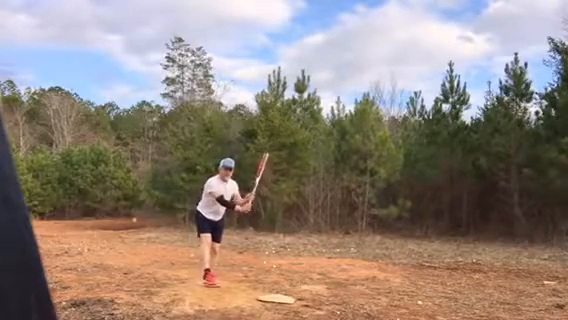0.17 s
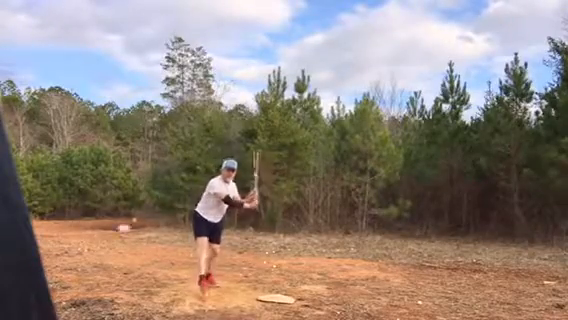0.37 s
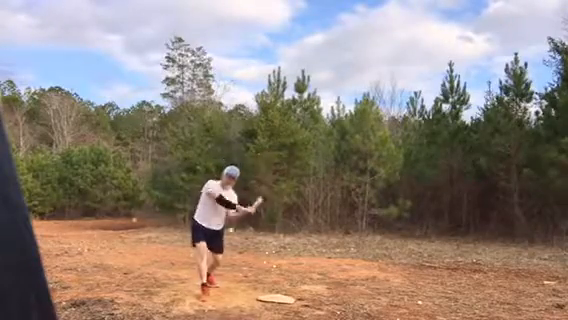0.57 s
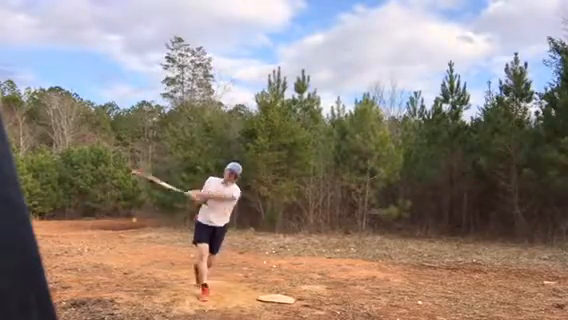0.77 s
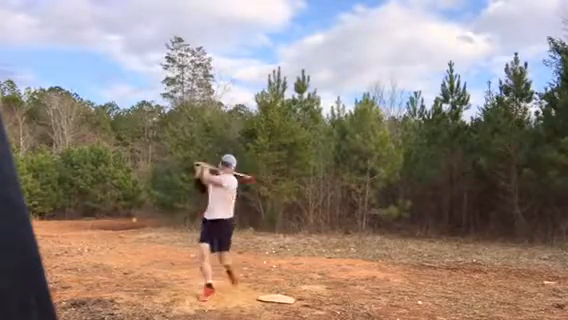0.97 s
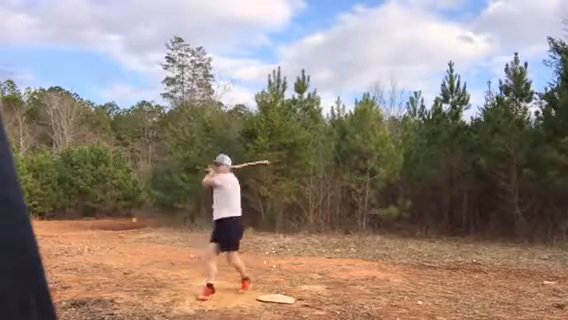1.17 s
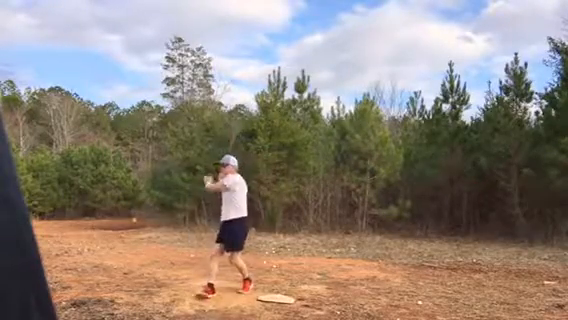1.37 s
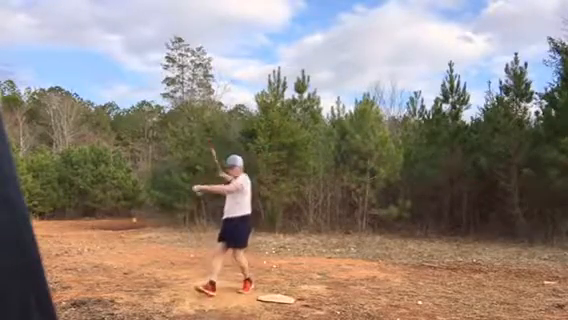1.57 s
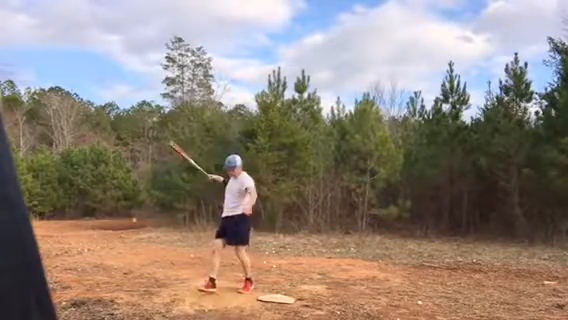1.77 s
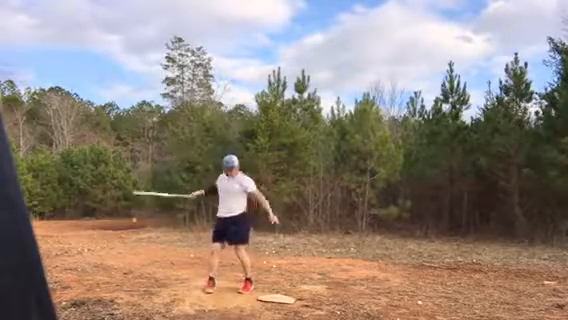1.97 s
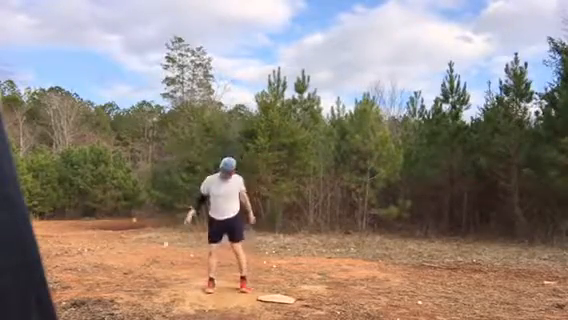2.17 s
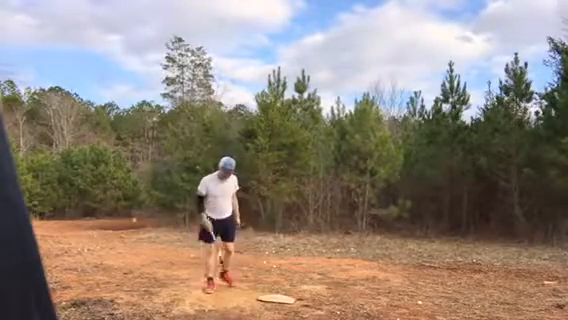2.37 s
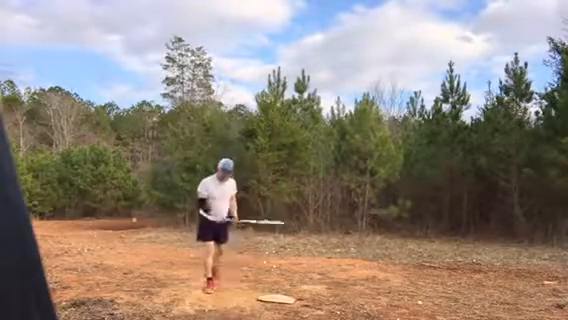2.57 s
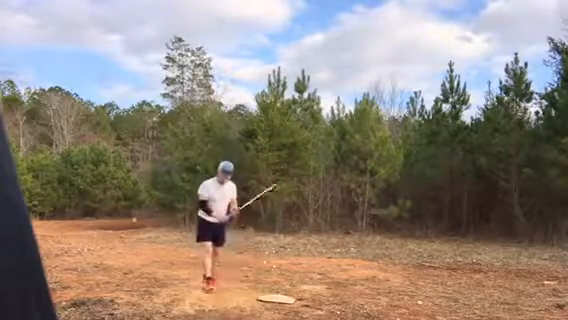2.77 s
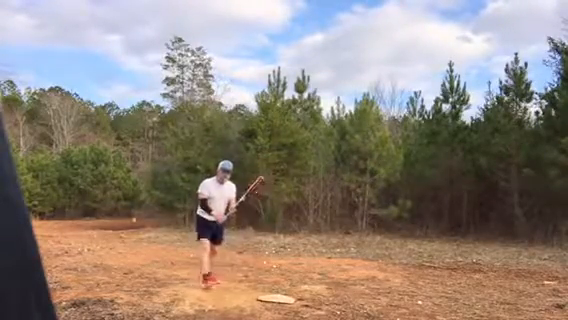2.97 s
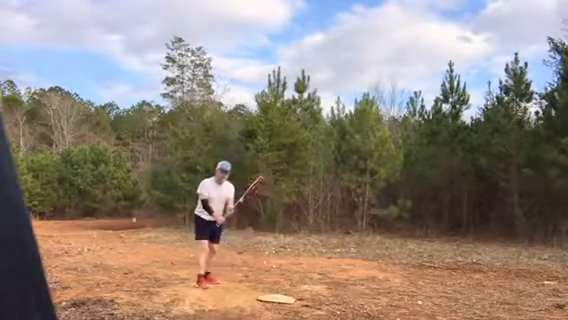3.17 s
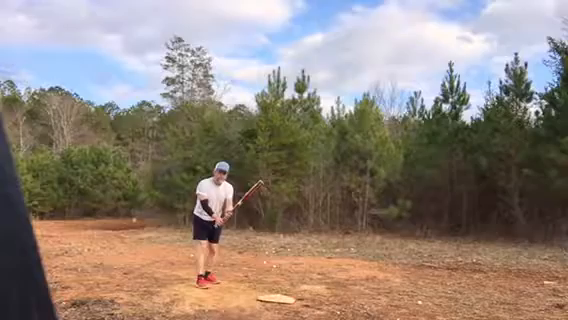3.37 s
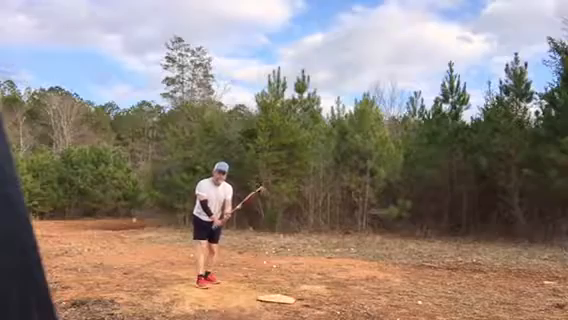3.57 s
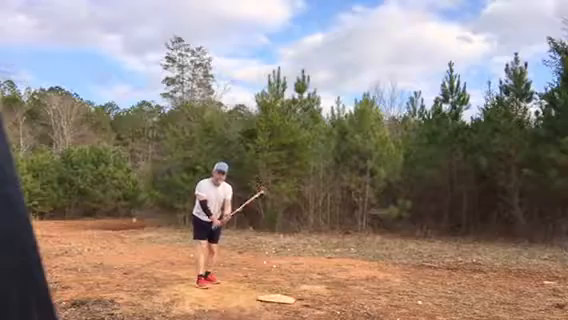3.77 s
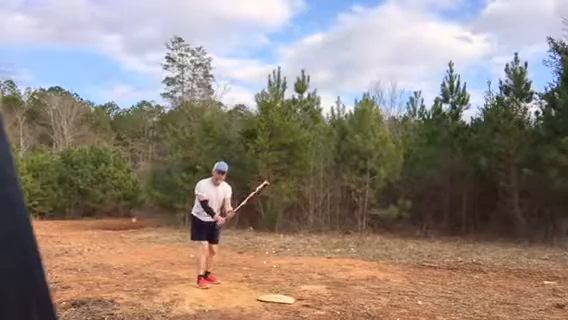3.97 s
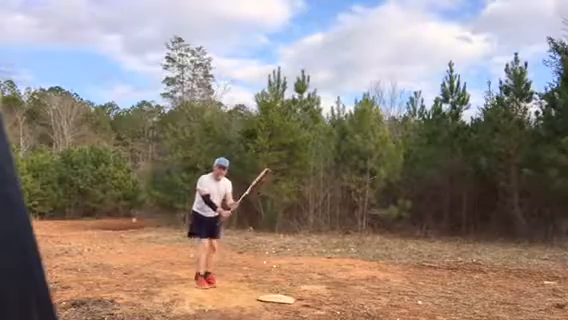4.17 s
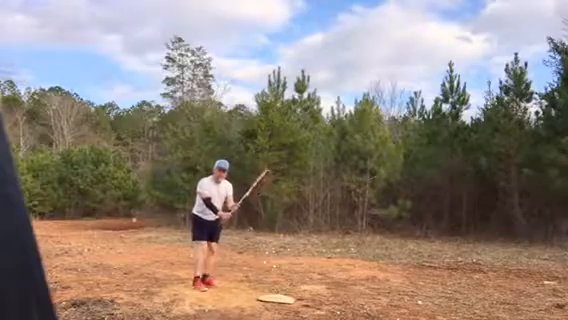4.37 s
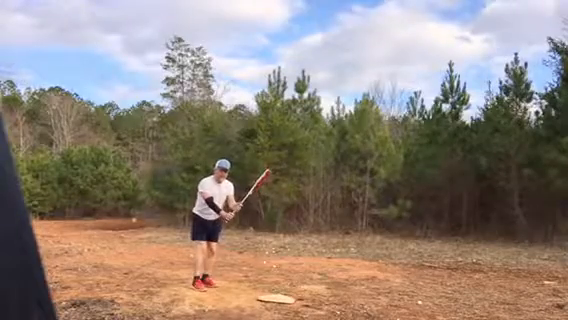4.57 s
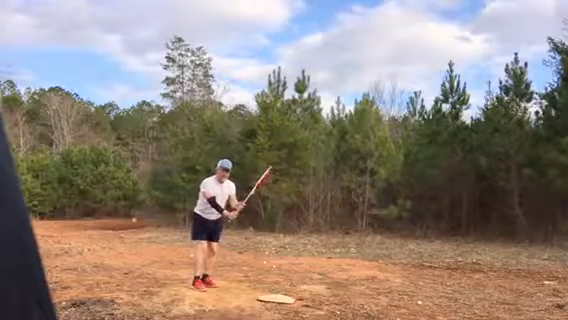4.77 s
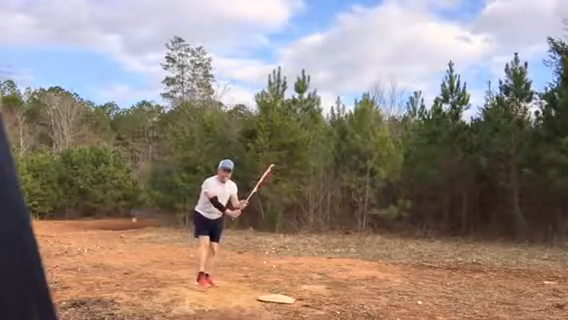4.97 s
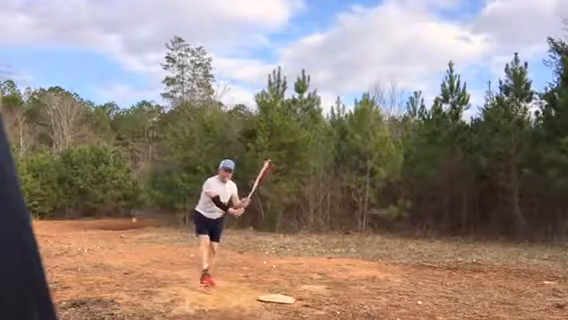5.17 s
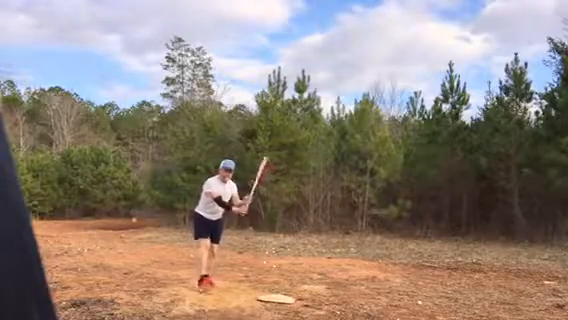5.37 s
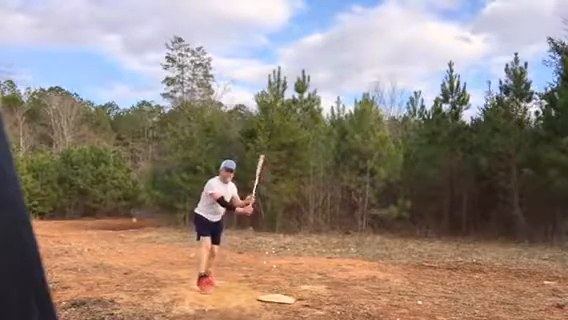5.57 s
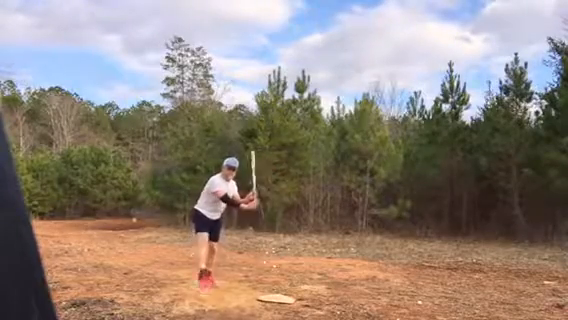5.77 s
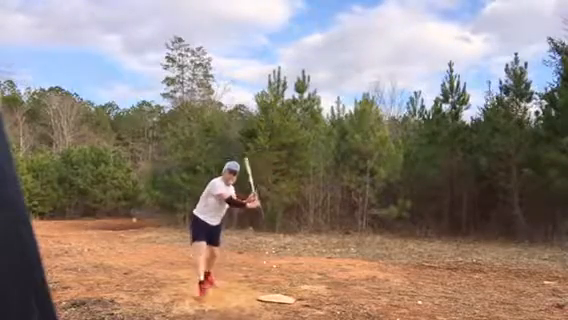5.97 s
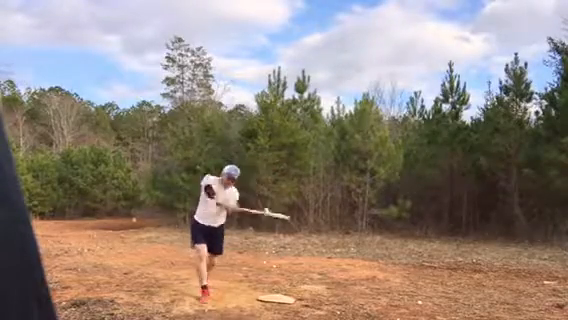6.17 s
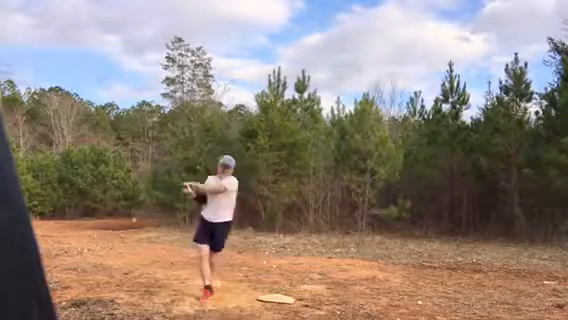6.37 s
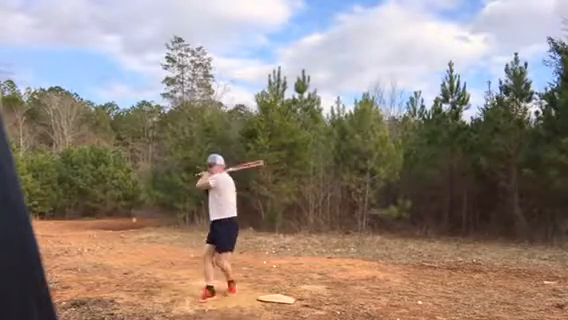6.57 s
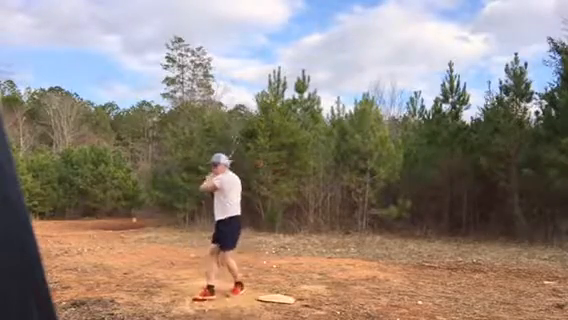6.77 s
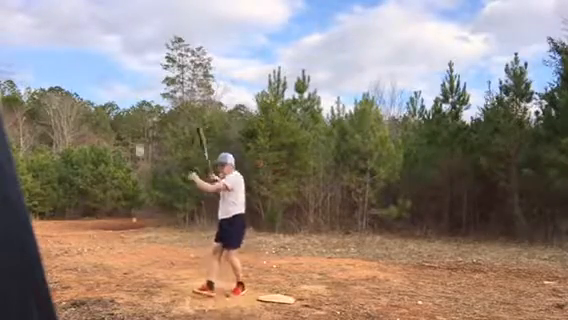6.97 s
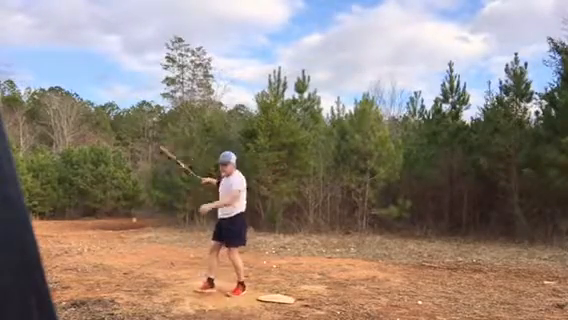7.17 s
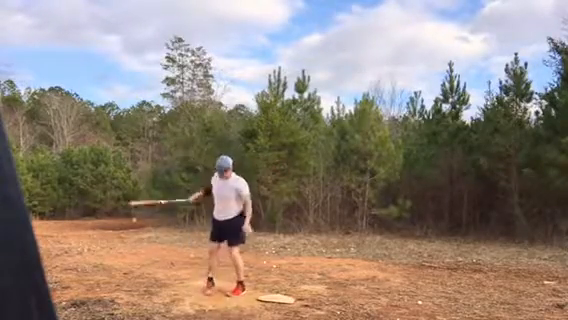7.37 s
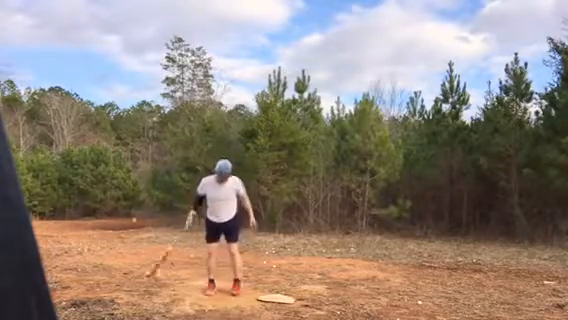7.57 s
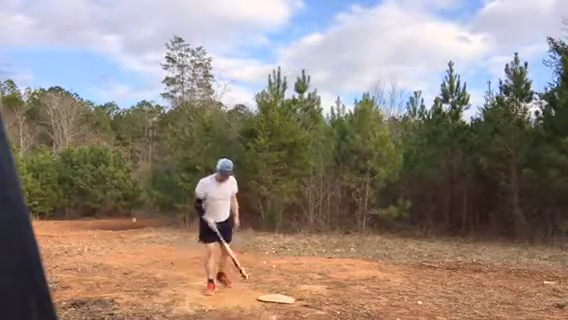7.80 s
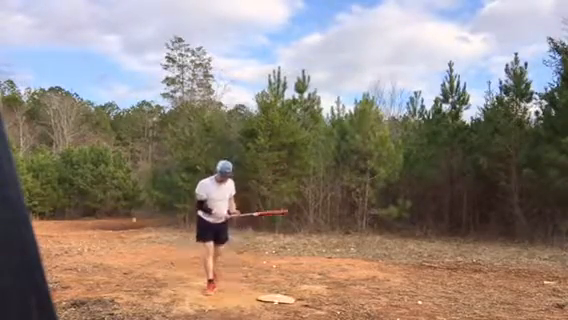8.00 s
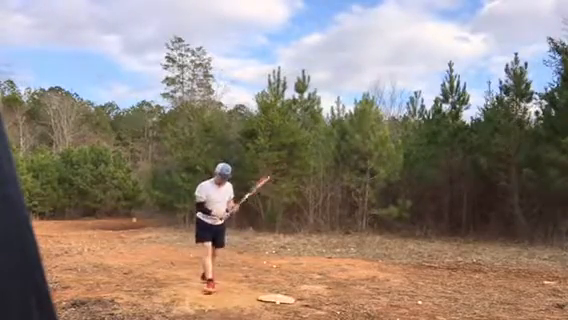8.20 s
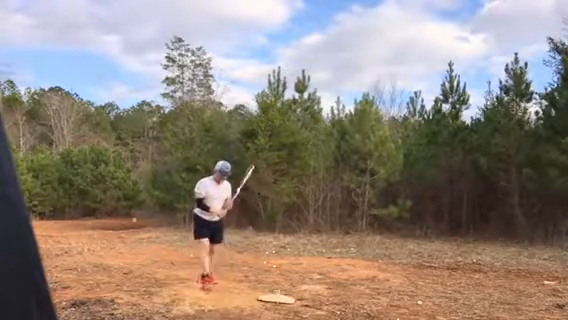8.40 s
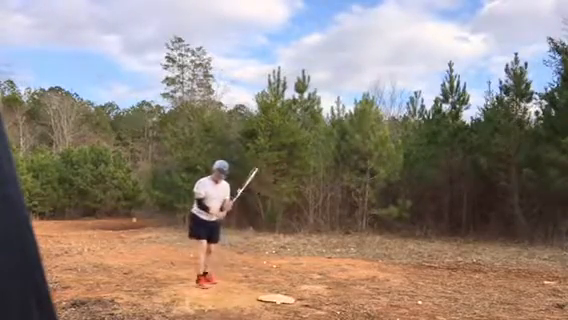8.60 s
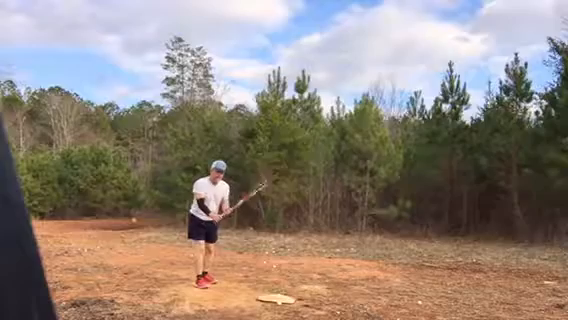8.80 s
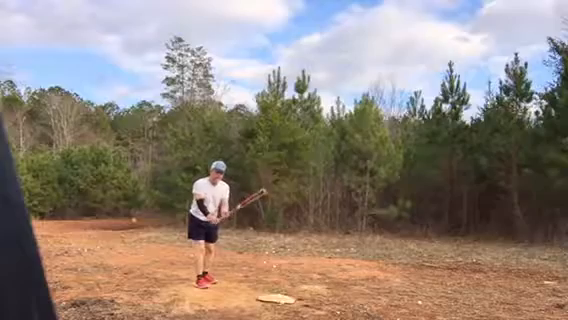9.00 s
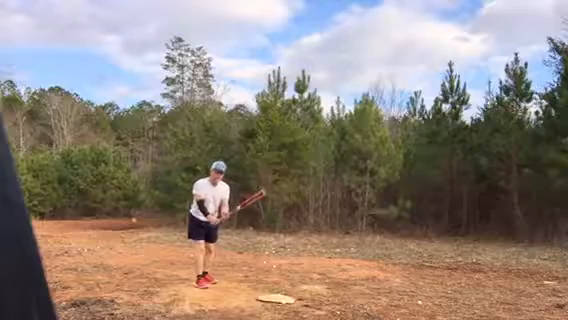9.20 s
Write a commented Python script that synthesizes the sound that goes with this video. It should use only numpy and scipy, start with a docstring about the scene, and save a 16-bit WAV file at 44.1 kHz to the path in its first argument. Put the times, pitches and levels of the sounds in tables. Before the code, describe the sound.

Outdoors among trees, the motor of a small pitching machine runs close by with a pulsing hum. Twice, several seconds apart, a ball knocks through the feed, thumps out of the wheel and is hit by a metal bat with a sharp, faintly echoing crack. Each ball then strikes a screen, the first softly and the second loudly. Faint ticks and rustles come near the end as the hum carries on.

```python
"""Batting practice in a clearing among pines. A small pitching machine hums and throbs close by throughout.
A ball rattles down the feed, exciting the housing's modes, and the wheel squeezes it out at 0.4 s: the
loaded motor sags, then recovers. At 0.8 s a metal bat cracks and rings, Doppler-shifted by the swing; the
ball thuds into a screen and the tree line echoes. A second ball is thrown at 5.9 s, is hit at 6.3 s and
strikes the screen harder. Faint ticks and rustles end the scene."""
import sys
import numpy as np
from scipy import signal
from scipy.fft import rfft, irfft, next_fast_len
from scipy.io import wavfile
from scipy.ndimage import uniform_filter1d

SR = 44100
rng = np.random.default_rng(int(sys.argv[2]) if len(sys.argv) > 2 else 0)


def master(y):
    """Save y as 16-bit WAV."""
    cut = np.clip(np.atleast_2d(y).T, -1, 1)
    pcm = np.round(cut * 32767)  # scale
    wavfile.write(sys.argv[1], SR, pcm.astype(np.int16))


N = 407484
T = np.arange(N) / SR
AFTER = T[:SR]  # the second that follows an impact


def undb(db):
    """Amplitude ratio of a level in decibels."""
    return 10 ** (np.asarray(db) / 20)


def spectral_gain(spectrum, size):
    """Gain of each FFT bin, interpolated in log frequency from (frequency [Hz], level [dB]) points."""
    hz, db = np.transpose(spectrum)
    bin_hz = np.maximum(np.fft.rfftfreq(size, 1 / SR), 1)
    return undb(np.interp(np.log(bin_hz), np.log(hz), db))


def colour(x, spectrum):
    """Linear filtering of x by a spectrum, normalised to unit rms."""
    shaped = irfft(rfft(x) * spectral_gain(spectrum, len(x)), len(x))
    return shaped / shaped.std()


def noise(spectrum, size=SR):
    """Filtered Gaussian noise of unit rms."""
    return colour(rng.standard_normal(next_fast_len(size)), spectrum)[:size]


def drift(rate, size=N):
    """Smooth random fluctuation: `rate` new values per second, standard deviation near 1."""
    step = int(SR / rate)
    held = rng.standard_normal(N // 100)[np.arange(size) // step]
    return 1.2 * uniform_filter1d(held, step)


def decay(t60, rise_s=1e-4):
    """Exponential damping, 60 dB in t60 seconds, after a quick rise."""
    return (1 - np.exp(-AFTER / rise_s)) * np.exp(-np.log(1000) * AFTER / t60)


def ring(modes, detune, rise_s=0.0046):
    """Free vibration: a sum of damped modes, each slightly detuned at random at every blow."""
    out = 0
    for hz, db, t60 in modes:
        detuned_hz = hz * (1 + detune * rng.standard_normal())
        out = out + undb(db) * decay(t60, rise_s) * np.sin(2 * np.pi * detuned_hz * AFTER)
    return out


def add(out, s, x):
    """Superpose x on out from time s."""
    start = max(int(s * SR), 0)
    out[start:start + len(x)] += x[:max(N - start, 0)]


# resonances of the machine's panels: (frequency [Hz], bandwidth [Hz], boost [dB])
PANEL_RESONANCES = [(194.3, 16.5, 8), (276, 19, 10), (761.7, 45, 4.5), (1193, 14, 3.5), (1827, 34, 4),
                    (1888, 27, 10.5), (3380, 32, 3)]
def panel_db(hz):
    """Resonance: each panel mode boosts nearby frequencies by a bell-shaped peak in dB."""
    return sum(db / (1 + (2 * (hz - centre) / width) ** 2) for centre, width, db in PANEL_RESONANCES)


# the wheel grips a ball, loading the motor: (time [s], thump level [dB], scuff level [dB])
THROWS = [(0.401, -18.5, -36), (5.933, -18.5, -30)]
# the load of each throw: (lowest hum frequency [Hz], labouring time [s], throb rate under load [Hz])
MOTOR_LOADS = [(343.6, .31, 12.37), (341.3, 2.3, 13.2)]
def motor_rates(idle_hz=376, recovery_s=4.29, earlier_throw_s=-4.5, throb_loss_per_hz=.082):
    """Relaxation after a load: the hum drops, then climbs back towards idle while the throb slows."""
    def recovery(since, low_hz, labour_s, throb_hz):
        """Hum frequency and throb rate after one throw; labouring delays the climb."""
        recovering_s = since - labour_s * (1 - np.exp(-since / labour_s))
        hum_hz = idle_hz - (idle_hz - low_hz) * np.exp(-recovering_s / recovery_s)
        return np.array([hum_hz, throb_hz - throb_loss_per_hz * (hum_hz - low_hz)])
    rates = recovery(T - earlier_throw_s, *MOTOR_LOADS[0])
    for (s, *_), load in zip(THROWS, MOTOR_LOADS):
        rates = np.where(T > s, recovery(np.maximum(T - s, 0), *load), rates)
    return rates


# partials of the motor: (frequency ratio to the hum, relative level [dB], swell with the throb [dB])
MOTOR_PARTIALS = [(.573, -34.5, 0), (.818, -32, 0), (.86, -28.5, 0), (1, 0, -1.15), (1.289, -33, 1.5),
                  (1.79, -32.5, 0), (2, -25, .3), (2.25, -22.5, 1.5), (2.58, -36.5, .5), (2.865, -36, .5),
                  (3, -34, 1), (4, -38, 1), (4.5, -39, 0), (5, -29.5, .3), (6, -45, 0), (7, -44.5, .5),
                  (8, -48, .5), (9, -43.5, .5), (10, -47, .5)]
def motor_hum(hum_hz, cycles, throb, base_db=-44, peak_db=5, peak_hz=354.8, peak_width_hz=26.3):
    """Forced vibration: the motor's partials grow as they glide through housing and panel resonances."""
    hum = 0
    for ratio, db, swell_db in MOTOR_PARTIALS:
        flutter_db = (.5 if ratio == 1 else .7) * drift(16)
        boost_db = 0 if ratio == 1 else 1.5 * panel_db(ratio * hum_hz)
        partial = np.sqrt(2) * np.sin(2 * np.pi * ratio * cycles)
        hum = hum + undb(db + flutter_db + boost_db + swell_db * throb) * partial
    housing_db = peak_db / (1 + (2 * (hum_hz - peak_hz) / peak_width_hz) ** 2)
    return hum * undb(base_db + housing_db)


# rumble of the running gear: (frequency [Hz], relative level [dB])
GEAR_SPECTRUM = [(20, -34), (35, -17), (55, -5), (80, 0.5), (130, -2.5), (235, -5.5), (330, 8), (450, -0.5),
                 (560, 0), (700, 1), (900, -4), (1400, -7), (1620, -7.5), (1730, -10.5), (1900, -6.5),
                 (2300, -16), (3000, -22.5), (6000, -31)]
def gear_rumble(cycles, throb, level_db=-53, throb_db=0.8, bump_gain=0.37, bump_period_cycles=32):
    """Broadband excitation: random shaking and a repeating pattern of bumps drive the panels."""
    bump_phase = cycles / bump_period_cycles % 1
    bumps = np.interp(bump_phase, np.linspace(0, 1, 3000), rng.standard_normal(3000))
    force = bump_gain * bumps + rng.standard_normal(N)
    shake = irfft(rfft(force) * undb(panel_db(np.fft.rfftfreq(N, 1 / SR))), N)
    return colour(shake, GEAR_SPECTRUM) * undb(level_db + throb_db * throb + 0.56 * drift(25))


# the wheel's rub, its thin squeak and its hiss: (frequency [Hz], relative level [dB])
RUB_SPECTRUM = [(600, -25), (950, -9), (1140, 2), (1190, 17), (1235, 6.5), (1450, 0), (1700, -24),
                (5000, -54)]
SQUEAK_SPECTRUM = [(4500, -28), (5700, -5), (6350, -3), (6900, -11), (8000, -21)]
HISS_SPECTRUM = [(500, -18), (2500, -8), (3300, 6), (4400, 5.5), (5700, 10), (6700, 1), (8200, 8.5),
                 (15000, 5)]
def wheel_noise(throb_phase, rub_db=-64.5, squeak_db=-81, hiss_db=-71.5, swell_db=5, lead_rad=.6):
    """Amplitude-modulated friction noise: the wheel rubs once a throb, just ahead of its hiss."""
    throb = np.cos(throb_phase)
    rub = noise(RUB_SPECTRUM, N) * undb(rub_db + swell_db * np.cos(throb_phase + lead_rad))
    squeak = noise(SQUEAK_SPECTRUM, N) * undb(squeak_db + swell_db * throb)
    tick_db = 2.8 * np.maximum(throb, 0) ** 2  # the hiss ticks on each crest
    hiss = noise(HISS_SPECTRUM, N) * undb(hiss_db + 1.1 * throb + tick_db + drift(40))
    return rub + squeak + hiss


def pitching_machine():
    """Common modulation: motor, gear and wheel all throb at one rate."""
    hum_hz, throb_hz = motor_rates()
    throb_phase = 2 * np.pi * np.cumsum(throb_hz) / SR
    throb = np.cos(throb_phase)
    cycles = np.cumsum(hum_hz + .2 * drift(30)) / SR
    return motor_hum(hum_hz, cycles, throb) + gear_rumble(cycles, throb) + wheel_noise(throb_phase)


# ticks near the plate, clacks of the shaken screen: (time [s], level [dB], centre [Hz], t60 [s])
TAPS = [(1.096, -48, 6000, 0.0097), (1.1161, -36.5, 810, 0.058), (1.137, -48, 1200, 0.025),
        (1.257, -41, 2190, 0.018), (1.2572, -48, 7050, 0.037), (2.1286, -53.5, 11000, 0.012),
        (6.6607, -19.5, 5760, 0.014), (6.6672, -27, 12000, 0.008), (6.6728, -29, 5300, 0.0068),
        (7.382, -39.5, 6000, 0.018), (8.0362, -52.5, 6000, .015)]
def taps():
    """Heavily damped impacts: each is a short burst of noise in a broad band."""
    out = np.zeros(N)
    for s, db, hz, t60 in TAPS:
        band = [(hz / 4, -16), (hz / 2, -4), (hz, 0), (hz * 2, -11), (hz * 4, -30)]
        add(out, s, undb(db) * noise(band) * decay(t60))
    return out


# swishes of the swing and faint rustles: (peak time [s], level [dB], width [s], ring level [dB])
RUSTLES = [(.735, -64.5, 0.042, -89), (6.275, -69.5, 0.038, -94), (8.62, -68.5, 0.024, -76),
           (8.73, -73, 0.092, -70.5)]
# their noise: (frequency [Hz], relative level [dB])
RUSTLE_SPECTRUM = [(1500, -15), (3100, 3), (5200, 9.5), (7000, 1), (8700, 1), (12000, -32)]
def rustles(ring_hz=3110, grit_db=3.5, grains_per_s=400):
    """Granular noise: dirt and dry needles roughen soft swells that carry a faint high ring."""
    swish = noise(RUSTLE_SPECTRUM, N) * undb(grit_db * drift(grains_per_s))
    ringing = noise([(ring_hz * .75, -60), (ring_hz, 0), (ring_hz * 1.3, -60)], N)
    out = np.zeros(N)
    for s, db, width_s, ring_db in RUSTLES:
        swell = np.exp(-.5 * ((T - s) / width_s) ** 2)
        out += swell * (undb(db) * swish + undb(ring_db) * ringing)
    return out


# the ball knocks down the feed: (time [s], knock level [dB], clack level [dB], tick level [dB])
FEED_KNOCKS = [(0.017, -39, -42.5, -53), (0.054, -21, -48, -66), (0.093, -33, -60, -57),
               (0.148, -27, -45.5, -45), (0.1932, -21.5, -45.5, -48), (0.237, -28.5, -52, -65),
               (0.275, -25.5, -55, -71), (0.298, -35, -51, -61), (.315, -43, -49, -59),
               (.374, -33, -64, -66), (4.084, -34, -45.5, -56), (4.3, -28, -61, -70),
               (5.421, -18.5, -48, -60), (5.443, -41, -46.5, -57), (5.472, -25.5, -52, -62),
               (5.552, -38, -44.5, -52), (5.576, -28.5, -48, -60), (5.596, -29, -55, -58),
               (5.662, -19.5, -43.5, -48), (5.710, -30, -52, -65), (5.745, -30, -52, -64),
               (5.766, -31, -61, -65), (5.820, -34, -50, -64), (5.855, -35, -54, -63)]
# modes of the plastic housing: (frequency [Hz], relative level [dB], t60 [s])
HOUSING_MODES = [(281.5, -25.5, 0.37), (323, 0, 0.051), (373, -15, 0.047), (640, -25, 0.092),
                 (750, -28, 0.035), (1240, -27, 0.033)]
# the clack and the tick of a knock: (frequency [Hz], relative level [dB])
CLACK_SPECTRUM = [(300, -3), (750, 12.5), (1200, 3), (1900, 1.5), (2600, -10.5), (4000, -15), (8000, -18)]
TICK_SPECTRUM = [(2000, 2), (3500, -16), (6500, -6), (8500, 11), (11000, -6), (15000, -9)]
def feed_rattle(clack_t60=0.076, tick_t60=0.0073):
    """Impact excitation: each knock of the ball rings the housing and adds contact noise."""
    out = np.zeros(N)
    for s, knock_db, clack_db, tick_db in FEED_KNOCKS:
        add(out, s, undb(knock_db) * ring(HOUSING_MODES, detune=0.028))
        add(out, s, undb(clack_db) * noise(CLACK_SPECTRUM) * decay(clack_t60))
        add(out, s, undb(tick_db) * noise(TICK_SPECTRUM) * decay(tick_t60))
    return out


# the grip and two rebounds of a throw: (delay [s], thump gain [dB], scuff gain [dB])
GRIP_CONTACTS = [(0, 3, 0.5), (.02, -8, -21), (0.033, -9, -17)]
# the thump and the scuff of the ball in the wheel: (frequency [Hz], relative level [dB])
THUMP_SPECTRUM = [(40, -40), (100, 2), (330, 8), (500, 1.5), (1000, -5), (1800, -18), (2500, -16),
                  (8000, -26)]
SCUFF_SPECTRUM = [(300, 11), (1500, 13.5), (2500, -9), (5200, -0.5), (6300, -3), (8000, 8.5), (11000, -3),
                  (15500, 3)]
def wheel_throws(noise_db=-7, thump_t60=0.071, scuff_width_s=0.004):
    """Impact and friction: the gripped ball thumps the housing and scuffs through the wheel."""
    thumps, friction = np.zeros(N), np.zeros(N)
    for s, thump_db, scuff_db in THROWS:
        for delay, thump_gain_db, scuff_gain_db in GRIP_CONTACTS:
            housing = ring(HOUSING_MODES, detune=0.021)
            dull_noise = undb(noise_db) * noise(THUMP_SPECTRUM) * decay(thump_t60, 0.0084)
            add(thumps, s + delay, undb(thump_db + thump_gain_db) * (housing + dull_noise))
            # the rubbing swells as the ball is drawn in and fades as it leaves
            swell = np.exp(-np.abs(T - s - delay - .001) / scuff_width_s)
            friction += undb(scuff_db + scuff_gain_db) * swell
    return thumps + friction * noise(SCUFF_SPECTRUM, N)


# the hit ball meets the screen: (time [s], slap level [dB], frame level [dB], flap level [dB])
SCREEN_THUDS = [(1.116, -38, -47.5, -42.5), (6.6588, -20, -26.5, -38)]
# the screen gives way and catches the ball again: (delay [s], gain [dB])
SLAP_BOUNCES = [(0, 0.5), (0.011, -2.5)]
# modes of the screen's frame: (frequency [Hz], relative level [dB], t60 [s])
FRAME_MODES = [(159, -5.5, 0.3), (287, -8, 0.27), (349.6, 14, 0.039), (449, 2, .12), (539, -2, 0.14),
               (703, 12, 0.054), (771, -0.5, 0.14), (980, -8.5, 0.28), (1170, -17, 0.24), (1324, -21, 0.36),
               (1710, -7.5, 0.076), (1863, -22, 0.31), (2730, -13, 0.12), (3138, -11, 0.14)]
# the slap, the fabric's flap and the slap's echo: (frequency [Hz], relative level [dB])
SLAP_SPECTRUM = [(35, -20), (70, -41), (250, 12.5), (650, -14.5), (1000, -3), (1700, -1.5), (2200, -18),
                 (3400, -6.5), (4300, -13.5), (5800, -9.5), (7700, -19), (8500, -16), (13000, -27),
                 (15500, -19)]
FLAP_SPECTRUM = [(30, -29), (72, 21), (105, 12), (140, 12), (163, -11), (195, 12), (1200, -4), (4000, -28)]
SLAP_ECHO_SPECTRUM = [(1500, -7), (3000, -3), (4800, 4), (6800, -11), (8600, -1), (12000, -14)]
def screen_thuds(slap_t60=0.074, flap_t60=0.4, echo_s=.2, echo_db=-45, echo_t60=0.96):
    """Inelastic collision: the ball slaps the screen, the frame rings, fabric flaps and trees echo."""
    out = np.zeros(N)
    for s, slap_db, frame_db, flap_db in SCREEN_THUDS:
        for delay, gain_db in SLAP_BOUNCES:
            add(out, s + delay, undb(slap_db + gain_db) * noise(SLAP_SPECTRUM) * decay(slap_t60, 0.00094))
        add(out, s + 0.0027, undb(frame_db) * ring(FRAME_MODES, detune=0.002))
        add(out, s, undb(flap_db) * noise(FLAP_SPECTRUM) * decay(flap_t60, 0.0042))
        echo = noise(SLAP_ECHO_SPECTRUM) * decay(echo_t60, 0.014)
        add(out, s + echo_s, undb(slap_db + echo_db) * echo)
    return out


def brush_scatter(x, t60=.8, rise_s=0.025):
    """Diffuse reflection: needles and twigs smear x, by convolution with a noise tail of unit energy."""
    tail = noise([(300, -20), (2500, 0), (8000, -8), (15000, -16)]) * decay(t60, rise_s)
    return signal.fftconvolve(x, tail / np.sqrt(np.sum(tail ** 2)))


# the swing carries the barrel past: (time after contact [s], approach speed [m/s], level [dB])
SWING_PATH = [(0, 25, 2), (.015, 16, -8), (.045, 13, -16), (.056, 11, -20), (.068, -8, -34),
              (.081, -18, -21), (.092, -17, -2), (.125, -15, -9), (.15, -15, -16), (.34, -12, -14)]
# modes of the barrel: (frequency [Hz], t60 [s], share of the swing's level change [0-1],
# level at the first hit [dB], level at the second hit [dB])
BARREL_MODES = [(154, 0.081, 1, -3, -15.5), (2590, 0.13, 0.8, -19, -8), (2550, 1, 1, -5, -40),
                (2960, 0.19, 0.7, -22, -3), (5830, 0.53, .6, -17, -48), (7430, 0.23, 0.84, -13, -8.5),
                (8600, 0.071, 1, -24, -13), (10040, 0.025, 1, -12, -4), (10650, 0.42, 1, -10, -45),
                (13700, 0.3, 1, -20, -19)]
def barrel_ring(hit, wobble, flex_hz=157, flex_t60=.11, waver_db=3.2, sound_speed=343):
    """Doppler effect: the swing bends the pitch of the barrel's modes; flexing adds a wobble."""
    times, speeds, levels = np.transpose(SWING_PATH)
    speed = np.interp(AFTER, times, speeds)
    swing_db = np.interp(AFTER, times, levels)
    flex = decay(flex_t60) * np.sin(2 * np.pi * flex_hz * AFTER)
    warped_time = np.cumsum(1 + speed / sound_speed + wobble * flex) / SR
    barrel = 0
    for hz, t60, share, *hit_db in BARREL_MODES:
        # each mode wavers in level as the bat turns
        turning_db = waver_db * drift(157, SR) * (1 - np.exp(-AFTER / 0.018))
        envelope = undb(hit_db[hit] + share * swing_db + turning_db) * decay(t60)
        barrel = barrel + envelope * np.sin(2 * np.pi * hz * warped_time)
    return barrel


# the crack of contact: (frequency [Hz], level at the first hit [dB], level at the second hit [dB])
CRACK_SPECTRA = [(200, -7, -12), (1920, -8.5, -5.5), (2780, -2.5, -6), (3740, -4, 4.5), (4830, 4, -2),
                 (5340, -15, -5), (6300, -26, -32), (7400, -22, -6), (8230, 14.5, -1), (8650, -22, -10),
                 (10200, -17, -12), (11000, -2, -4), (12500, -6, -11), (14800, 4, -1), (16000, -18, -13)]
def contact_crack(hit, t60, rise_s=0.0012):
    """A brief impact is broadband: the phases of a short noise burst take on the crack's spectrum."""
    burst = rfft(rng.standard_normal(SR) * decay(t60, rise_s))
    gain = spectral_gain([(hz, hit_db[hit]) for hz, *hit_db in CRACK_SPECTRA], SR)
    return irfft(burst / np.abs(burst) * gain, SR) * (AFTER < .5)


# sound scattered by the ground, and by brush and trees: (frequency [Hz], relative level [dB])
GROUND_SPECTRUM = [(500, -23), (2700, 6), (5000, 2), (10000, 0), (15000, -3)]
TREE_SPECTRUM = [(800, -19), (2000, 9.5), (3000, 6), (5000, 6), (6800, -4), (8500, 4), (11000, -11),
                 (15000, -6)]
# bat meets ball: (time [s], crack gain [dB], crack t60 [s], ring gain [dB], pitch wobble [fraction],
# ground scatter [dB], brush scatter [dB], tree echo [dB])
BAT_HITS = [(.8368, -0.5, 0.0055, -33.5, 0.061, -42, -58, -58),
            (6.3326, -0.5, 0.03, -23.5, .008, -54, -56.5, -61)]
def bat_hits(ground_t60=0.23, brush_t60=1.66, smear_s=.115, smear_db=-30.5, echo_s=.42, echo_t60=1.0):
    """Direct sound and reflections: crack and ring arrive first, then ground, brush and tree line."""
    out = np.zeros(N)
    for hit, (s, crack_db, crack_t60, ring_db, wobble, *reflection_db) in enumerate(BAT_HITS):
        ground_db, brush_db, echo_db = reflection_db
        barrel = undb(ring_db) * barrel_ring(hit, wobble)
        add(out, s, barrel + undb(crack_db) * contact_crack(hit, crack_t60))
        add(out, s, undb(ground_db) * noise(GROUND_SPECTRUM) * decay(ground_t60, 0.0043))
        add(out, s, undb(brush_db) * noise(TREE_SPECTRUM) * decay(brush_t60, 0.04))
        add(out, s + smear_s, undb(smear_db) * brush_scatter(barrel))
        add(out, s + echo_s, undb(echo_db) * noise(TREE_SPECTRUM) * decay(echo_t60, 0.014))
    return out


def scene():
    """Superposition: the pressures of all sources add at one point."""
    mix = pitching_machine() + feed_rattle() + wheel_throws() + bat_hits() + screen_thuds()
    return (mix + taps() + rustles())[None]


def record(dry, low_hz=42, top_hz=15900):
    """Band limiting: a high-pass removes the deep bass and a steep low-pass the highest treble."""
    high_passed = signal.sosfilt(signal.butter(3, low_hz, "high", fs=SR, output="sos"), dry)
    return signal.sosfilt(signal.ellip(10, .2, 80, top_hz, fs=SR, output="sos"), high_passed)


dry = scene()
out = record(dry)
master(out)
```